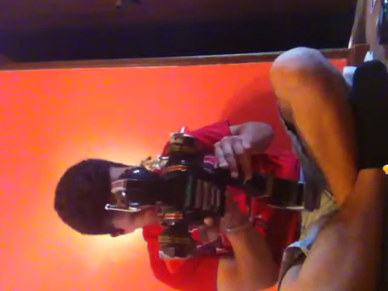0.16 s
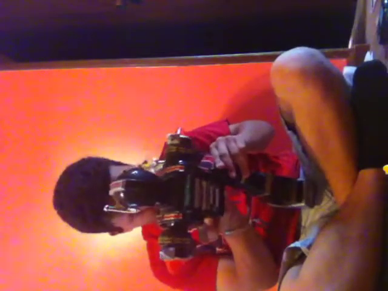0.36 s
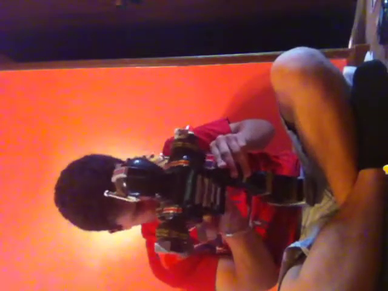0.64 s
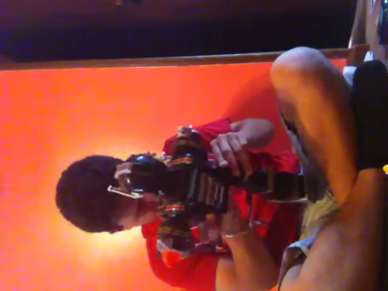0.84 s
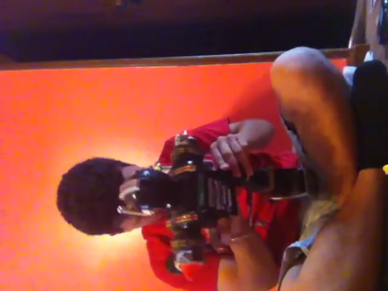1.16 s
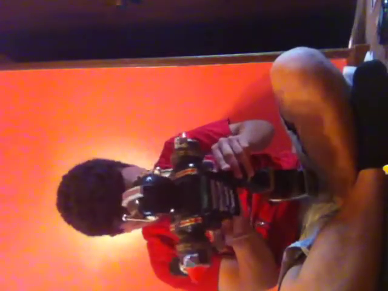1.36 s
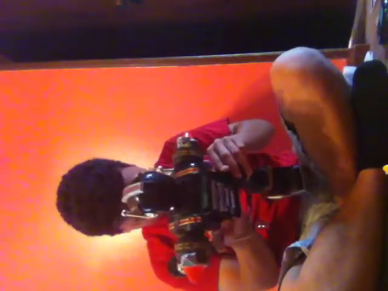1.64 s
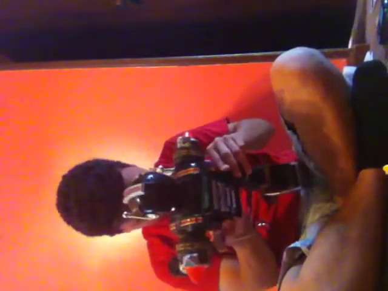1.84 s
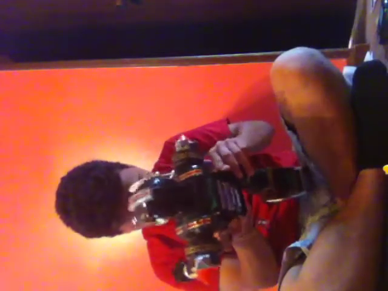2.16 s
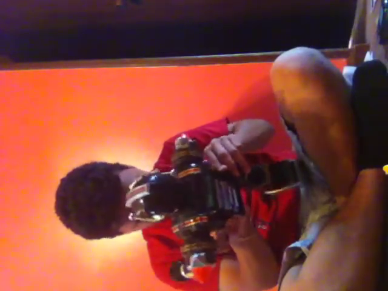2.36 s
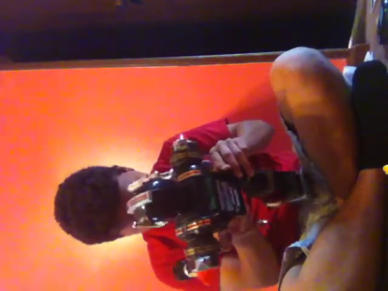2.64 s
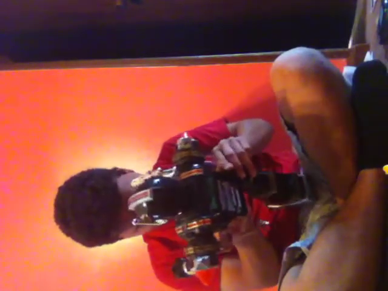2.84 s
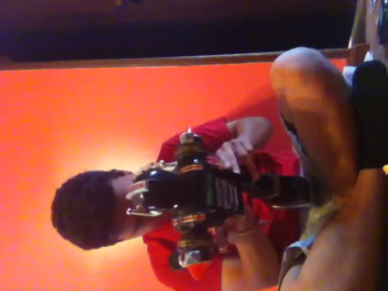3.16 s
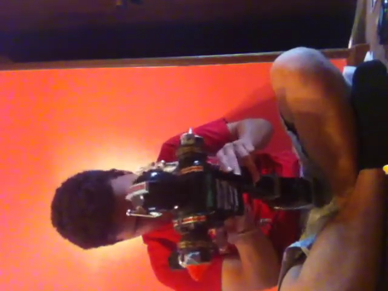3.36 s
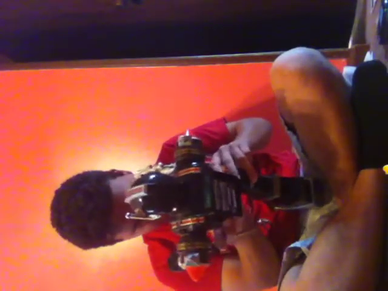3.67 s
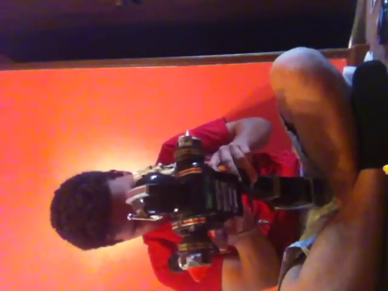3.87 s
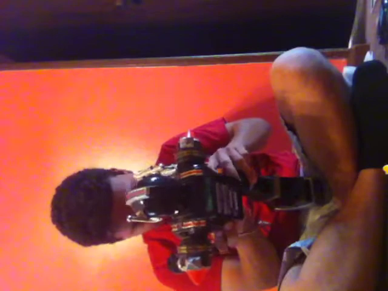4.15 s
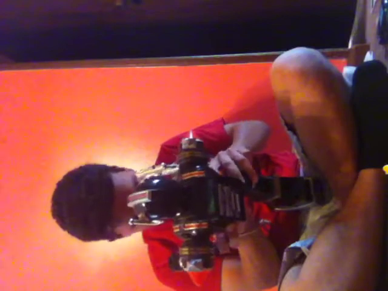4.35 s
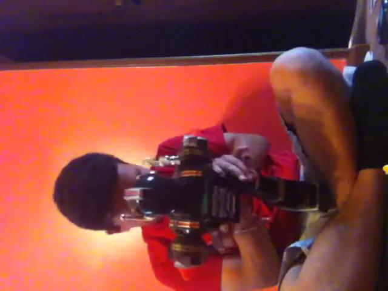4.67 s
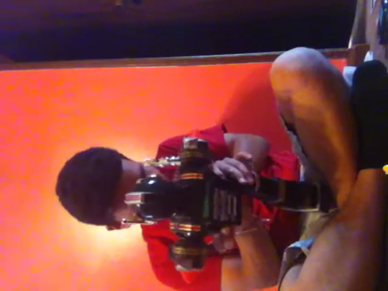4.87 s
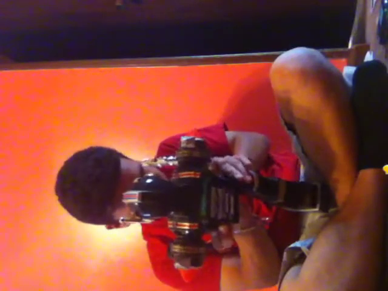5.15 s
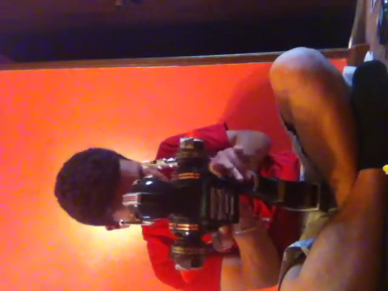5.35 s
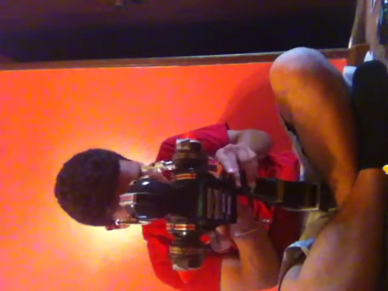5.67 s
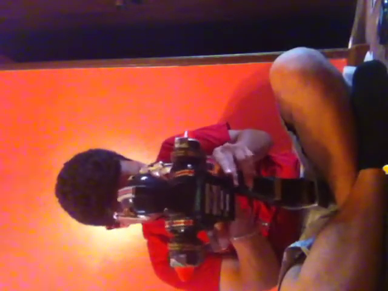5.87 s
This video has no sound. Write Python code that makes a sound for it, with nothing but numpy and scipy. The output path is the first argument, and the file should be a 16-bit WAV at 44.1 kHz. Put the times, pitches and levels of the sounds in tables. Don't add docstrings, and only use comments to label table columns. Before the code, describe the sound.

In a small quiet room, a hard plastic toy is handled about a metre from a small microphone. Very faint ticks and a low creak come first, then a clearer click at 0.64 s and a bright snap at 0.73. Light clicks follow around 1.2 to 1.4 and 1.8 to 2.0 seconds. A duller snap lands at 2.3, a cluster of small knocks at 2.5 to 2.7, and a louder snap at 2.95. From 3 to 4.3 only sparse, soft clicks and rubs remain. Clicks thicken from 4.4, with a tiny short squeak at 4.6, building to the loudest, sharpest snap at 4.88 with a hollow rub, then another at 5.13. Scattered light clicks continue to 6 seconds. Fingers slide faintly over plastic; short room echoes, a wavering low hum, rumble and thin hiss persist underneath.

```python
import sys
import numpy as np
from scipy import signal
from scipy.io import wavfile
from scipy.ndimage import uniform_filter1d

SR = 44100
rng = np.random.default_rng(int(sys.argv[2]) if len(sys.argv) > 2 else 0)


def to_linear_factor(level_db):
    exponent = np.asarray(level_db, float) / 20
    return 10 ** exponent


def master(y):
    cut = np.clip(np.atleast_2d(y).T, -1, 1)
    pcm = np.round(cut * 32767)
    wavfile.write(sys.argv[1], SR, pcm.astype(np.int16))


N = 265041

# start_s, peak_db, part_pitch_hz, shell_db, edge_db (the last two relative)
SNAPS = [
    (0.729, -20.5, 3730, -40, -6.5),
    (2.297, -19.5, 3240, -21, -16),
    (2.945, -16, 3300, -17, -28),
    (4.883, -8, 4460, -21.5, -9.5),
    (5.135, -17.5, 4850, -18.5, -8.5),
]


def snap(start_s, peak_db, pitch_hz, shell_db, edge_db):
    chatter_s = 0.012
    press = (start_s - 0.0025, peak_db - 20, 4800, shell_db, -14, chatter_s)
    home = (start_s, peak_db, pitch_hz, shell_db, edge_db, chatter_s)
    rebound = (start_s + 0.005, peak_db - 13, 8320, shell_db, -5.5, chatter_s)
    return [press, home, rebound]


# start_s, peak_db, part_pitch_hz, shell_db (relative)
EDGE_TICKS = [(0.134, -58, 1850, -2), (1.554, -45.5, 6740, -9.5), (1.926, -39.5, 9700, -10),
              (2.305, -27, 5140, -24), (2.744, -54, 4110, -4), (3.259, -53, 2270, -15),
              (3.762, -38, 3270, -13.5), (5.45, -46, 3020, -5), (5.577, -39, 3200, -0.5)]
CORNER_CLICKS = [(0.189, -50, 3120, -3.5), (0.202, -43, 2380, -8), (0.605, -48.5, 1980, 4),
                 (0.62, -50, 2710, -5), (1.252, -49, 7030, -13), (1.316, -31.5, 3380, -13),
                 (1.796, -38, 8100, -18), (1.953, -39, 1830, -11), (2.608, -32.5, 3700, -14),
                 (2.916, -36.5, 5300, -11.5), (3.004, -46, 2350, -5), (3.047, -37, 2650, -10),
                 (4.41, -37, 6930, -22), (4.43, -39, 8100, -22), (4.441, -38, 6700, -10),
                 (4.83, -32.5, 1900, -6), (5.584, -37, 3230, -3.5), (5.638, -40.5, 2600, -18),
                 (5.924, -32, 5100, -22), (5.981, -33, 5100, -14), (5.988, -40.5, 4500, -16)]
FACE_CLICKS = [(0.643, -29, 2600, -14.5), (1.174, -56.5, 6760, 2.5), (1.374, -46, 2200, -26),
               (2.545, -32.5, 1910, -19), (2.58, -33, 2300, -21), (2.668, -43, 5900, -4),
               (3.079, -34, 2310, -13), (3.103, -42, 1930, -3), (3.227, -47.5, 2610, -5.5),
               (3.498, -47.5, 3270, -9.5), (3.749, -47, 3160, -11), (4.05, -33, 7020, -15),
               (4.086, -44, 2220, -2), (4.157, -58.5, 5400, 4.5), (4.192, -54.5, 2750, 2),
               (4.346, -50.5, 2600, -0.5), (4.4, -41, 5340, -15), (4.601, -42.5, 4860, -22),
               (4.655, -35.5, 3560, -25), (5.078, -43.5, 2200, 1), (5.344, -38, 7620, -10),
               (5.725, -50, 4490, -13), (5.883, -44.5, 2340, -5.5)]
DULL_KNOCKS = [(0.054, -54, 6910, 0.5), (1.272, -32, 2180, -40), (1.273, -31.5, 3650, -43),
               (1.978, -33, 2160, -17), (2.041, -45.5, 2310, -8), (2.446, -42, 1840, -27),
               (3.798, -45, 1790, -3.5), (4.39, -40.5, 2730, -14), (4.624, -33, 3560, -28),
               (4.708, -35.5, 5000, -14), (4.736, -41, 2260, -2), (4.785, -43.5, 2510, -10),
               (4.812, -33.5, 4660, -10), (4.82, -44.5, 4730, 4), (5.059, -26.5, 5200, -19),
               (5.244, -40, 4830, -9), (5.353, -40.5, 2710, -11.5), (5.682, -48.5, 3250, 5),
               (5.799, -41, 5060, -15), (5.817, -49, 5080, -23)]
EDGE_DB = [-2, -11, -14, -26]


def contacts():
    touches = []
    for row in SNAPS:
        touches += snap(*row)
    kinds = (EDGE_TICKS, CORNER_CLICKS, FACE_CLICKS, DULL_KNOCKS)
    for rows, edge_db in zip(kinds, EDGE_DB):
        touches += [(*row, edge_db, 0.014) for row in rows]
    return touches


# pitch_hz, level_db, fade_s (time to fall 60 dB)
SHELL = [(590, 2.5, 0.017), (715, -7, 0.042), (890, -5.5, 0.055), (1010, 2.5, 0.053), (1201, 6.5, 0.044),
         (1372, 8.5, 0.025), (1820, -2, 0.0056)]
# pitch_hz, level_db, fade_s
PANELS = [(1960, -34, 0.012), (2600, -7, 0.0076), (3240, 1.5, 0.0037), (3940, 0.5, 0.004),
          (4576, -3, 0.0084), (5210, 3, 0.0037)]
# pitch_hz, level_db, fade_s
EDGES = [(6450, 6.5, 0.0041), (7250, 0.5, 0.0051), (8100, 5.5, 0.0051), (9230, 1, 0.0032),
         (10250, -3.5, 0.0048), (11800, -15, 0.0016), (13600, -23, .002)]


def contact(peak_db, pitch_hz, shell_db, edge_db, chatter_s):
    t = np.arange(2000) / SR / chatter_s
    hits = rng.standard_normal(2000) * (rng.random(2000) < .4)
    chatter = hits * (1 - 0.52 * np.exp(-t / 0.023)) * np.exp(-3.2 * t)
    blow = np.linalg.norm(chatter) * (t == 0)
    drive = np.array([chatter, blow])

    part = evened(ring([(pitch_hz, 0, .007)], spread_db=0, detune=0))
    panels = evened(high_pass(ring(PANELS, spread_db=1.0, detune=0.042), hz=880, order=2))
    bare = evened(ring([(5200, 0, .001)], spread_db=0, detune=0))
    body = np.array([panels + 1.04 * part, 0.61 * panels + to_linear_factor(0.5) * bare])
    shell = ring(SHELL, spread_db=2.7, detune=0.013) * to_linear_factor([[0], [-2.5]])
    edges = ring(EDGES, spread_db=2.5, detune=0.064)[None]

    total = 0
    for ringing, level_db in ((body, -2.5), (shell, shell_db + 4.5), (edges, edge_db + 5.5)):
        sound = signal.oaconvolve(drive, ringing, axes=1)
        total = total + sound / abs(sound[0]).max() * to_linear_factor(peak_db + level_db)
    return total


def ring(modes, spread_db, detune):
    hz, db, fade_s = np.transpose(modes)[:, :, None]
    louder, sharper = np.clip(rng.standard_normal((2, len(modes), 1)), -1.5, 1.5)
    t = np.arange(3000) / SR
    strength = to_linear_factor(db + spread_db * louder - 60 * t / fade_s)
    tones = strength * np.sin(2 * np.pi * hz * (1 + detune * sharper) * t)
    return tones.sum(axis=0)


# start_s, length_s, level_db, pitch_hz
SCUFFS = [(0.169, 0.065, -61.5, 1190), (.599, 0.047, -55, 875), (0.615, 0.029, -59, 6000),
          (0.741, 0.067, -61, 1100), (2.32, 0.076, -57, 1500), (2.551, 0.088, -59, 1200),
          (1.601, 0.27, -65, 7000), (1.934, .07, -60, 1500), (1.989, .12, -62, 5500),
          (2.614, .14, -60, 5800), (2.948, 0.21, -59, 1300), (3.211, 0.044, -66, 1900),
          (4.377, 0.038, -58, 4000), (4.416, 0.08, -61, 6000), (4.602, 0.072, -56, 5860),
          (5.221, 0.052, -59.5, 1500), (5.33, 0.02, -59, 4000), (5.442, 0.034, -55, 890)]
HOLLOW_RUBS = [(2.526, .032, -58, 685), (2.65, 0.054, -61.5, 1320), (4.331, .055, -65, 1150),
               (4.391, 0.033, -52, 950), (4.7, 0.065, -57, 1180), (4.805, 0.029, -43.5, 1200),
               (4.88, .016, -26, 1030), (4.895, 0.085, -56.5, 990), (5.072, .066, -62.5, 1180),
               (5.133, 0.046, -45, 1100), (5.575, 0.037, -53.5, 1090), (5.668, 0.036, -55, 1040),
               (5.876, .032, -66, 1200), (5.973, 0.047, -61, 1080)]
CREAKS = [
    (.174, 0.13, -55, 300),
    (1.977, .13, -66, 2230),
    (4.74, 0.037, -74, 7050),
]
RUB_WIDTH = [0.66, 0.26, 0.047]


def strokes():
    rubs = []
    for rows, width in zip((SCUFFS, HOLLOW_RUBS, CREAKS), RUB_WIDTH):
        rubs += [(*row, row[-1] * width) for row in rows]
    return rubs


def rub(length_s, level_db, pitch_hz, width_hz):
    count = int(length_s * SR)
    roughness = uniform_filter1d(rng.exponential(1, count), size=40)
    slips = rng.standard_normal(count) * to_linear_factor(6.38 * roughness)
    r = np.exp(-np.pi * width_hz / SR)
    tone = signal.lfilter([1, 0, -1], [1, -2 * r * np.cos(2 * np.pi * pitch_hz / SR), r * r], slips)
    return to_linear_factor(level_db) * evened(tone) * signal.windows.tukey(count, .6)


# time_s, slip_rate_hz, level_db
SQUEAK = [
    (4.6, 1580, -69),
    (4.61, 1670, -55.5),
    (4.642, 1742, -47.5),
    (4.655, 1710, -65),
]
# multiple (of the slip rate), level_db
SQUEAK_ORDERS = [(1, -0.5), (2, -4.5), (3, -8), (4, -4), (5, -22)]


def squeak():
    s, hz, db = np.transpose(SQUEAK)
    t = np.arange(s[0], s[-1], 1 / SR)
    wobble = evened(uniform_filter1d(rng.standard_normal(len(t)), size=60))
    turns = np.cumsum(np.interp(t, s, hz) * (1 + 0.018 * wobble)) / SR
    tone = sum(to_linear_factor(level_db) * np.sin(2 * np.pi * k * turns) for k, level_db in SQUEAK_ORDERS)
    grit = 1 + 0.2 * rng.standard_normal(len(t))
    loudness = to_linear_factor(np.interp(t, s, db)) * signal.windows.tukey(len(t), .25)
    return s[0], np.sqrt(2) * tone * grit * loudness


# time_s, level_db
SLIDE = [(0.0, -66), (0.6, -69.5), (0.85, -65), (2.0, -68.5), (2.4, -63.5), (2.7, -70), (2.96, -62),
         (3.5, -66.5), (4.4, -66.5), (5.06, -58), (5.4, -66), (6.01, -68)]
# pitch_hz, level_db
SLIDE_COLOUR = [(400, -5.5), (1200, 1), (2500, -5.5), (5500, -3), (8000, -3), (12000, -9), (16000, -33)]


def slide():
    power = np.maximum(to_linear_factor(along(SLIDE)) ** 2 - to_linear_factor(-68.0) ** 2, 0)
    return np.sqrt(power) * coloured(SLIDE_COLOUR, patchy_db=4.0, size=512)


# time_s, level_db
HUM = [(0.0, -64), (1.4, -58.5), (2.3, -58), (3.2, -62), (4.3, -63), (5.2, -57), (6.01, -58.5)]


def hum():
    drift = rng.standard_normal((2, N))
    drift = evened(uniform_filter1d(uniform_filter1d(drift, size=3000), size=3000))
    turns = np.cumsum(57 + 1.28 * drift[0]) / SR
    return np.sqrt(2) * to_linear_factor(along(HUM) - 3.5 + 1.0 * drift[1]) * np.sin(2 * np.pi * turns)


# pitch_hz, level_db (per Hz)
FLOOR = [(15, -31), (25, -13), (59, -2.5), (120, 0.5), (190, -2), (373, -9), (476, -15.5), (560, -11),
         (734, -16), (1190, -19), (4030, -23), (5880, -23.5), (6920, -22), (14800, -28.5), (16000, -28)]


def rumble_and_hiss():
    return to_linear_factor(-57.5) * coloured(FLOOR, patchy_db=1.08, size=2048)


# pitch_hz, fade_s (time to fall 60 dB)
ROOM = [(300, 0.21), (1000, 0.29), (3000, 0.33), (6000, 0.29), (12000, 0.21)]


def room(x):
    taps = np.zeros(SR // 2)
    at = np.arange(160, len(taps) - 12, 12)
    taps[at + rng.integers(0, 12, len(at))] = rng.choice([-1., 1.], len(at))
    hz, t, z = signal.stft(taps, SR, nperseg=128)
    fading = to_linear_factor(-60 * t / read(ROOM, hz)[:, None])
    tail = signal.istft(z * fading, SR, nperseg=128)[1]
    return signal.fftconvolve(x, tail / np.linalg.norm(tail))[:N]


def coloured(points, patchy_db, size):
    hz = np.fft.rfftfreq(size, 1 / SR)
    a, b, patches = rng.standard_normal((4 * N // size + 5, len(hz), 3)).T
    patches = uniform_filter1d(patches, size=20, axis=0)
    patches = evened(uniform_filter1d(patches, size=6, axis=1))
    z = (a + 1j * b) * to_linear_factor(read(points, hz)[:, None] + patchy_db * patches)
    return evened(signal.istft(z, nperseg=size, noverlap=size * 3 // 4)[1][:N])


def evened(x):
    return x / np.sqrt(np.mean(x ** 2) + 1e-20)


def read(points, hz):
    f, value = np.transpose(points)
    return np.interp(np.log(hz + 1), np.log(f + 1), value)


def along(rows):
    return np.interp(np.arange(N) / SR, *np.transpose(rows))


def high_pass(x, hz, order):
    return signal.sosfilt(signal.butter(order, hz, "high", fs=SR, output="sos"), x)


def low_pass(x, hz, order):
    return signal.sosfilt(signal.butter(order, hz, fs=SR, output="sos"), x)


def add(mix, start_s, sound):
    part = mix[round(start_s * SR):][:len(sound)]
    part += sound[:len(part)]


def scene():
    toy = np.zeros((2, N))
    for start_s, *touch in contacts():
        for path, sound in zip(toy, contact(*touch)):
            add(path, start_s, sound)
    for start_s, *stroke in strokes():
        sound = rub(*stroke)
        for path in toy:
            add(path, start_s, sound)
    start_s, sound = squeak()
    add(toy[0], start_s, sound)
    add(toy[1], start_s, 0.68 * sound)

    toy = high_pass(toy, hz=440, order=2)
    direct, spread = low_pass(toy, hz=13200, order=3)
    seconds = np.arange(N) // SR
    wet = sum(room(spread * (seconds == k)) for k in np.unique(seconds))
    background = slide() + hum() + rumble_and_hiss()
    return (direct + to_linear_factor(-9.5) * wet + background)[None]


def band_limit(x):
    return signal.sosfilt(signal.butter(12, 16000, fs=SR, output="sos"), x)


# start_s, length_s, lowest_hz, depth_db
DROPOUTS = [(.7165, .0085, 1300, 50), (.738, .015, 13000, 12), (1.3, .01, 7000, 12),
            (2.527, .006, 1500, 12), (2.955, .01, 12000, 30), (4.898, .06, 12800, 9),
            (4.8722, .007, 2600, 50), (5.127, .004, 1200, 12), (5.568, .004, 1200, 14),
            (5.918, .003, 2500, 12), (5.967, .008, 7500, 14)]


def record(dry):
    x = high_pass(dry, hz=43.6, order=4)
    x = low_pass(x, hz=15900, order=14)
    hz, t, z = signal.stft(x, SR, nperseg=128, noverlap=96)
    for start_s, length_s, lowest_hz, depth_db in DROPOUTS:
        during = (t > start_s) & (t < start_s + length_s)
        z = z * to_linear_factor(-depth_db * np.outer(hz > lowest_hz, during))
    x = signal.istft(z, SR, nperseg=128, noverlap=96)[1][:, :N]
    return band_limit(x)


dry = scene()
out = record(dry)
master(out)
```